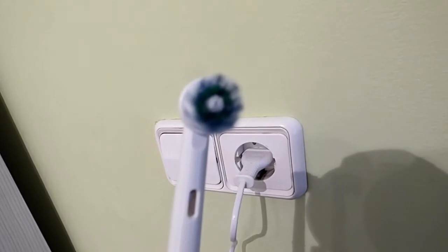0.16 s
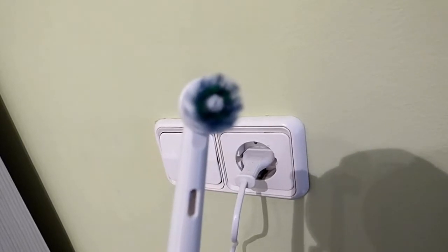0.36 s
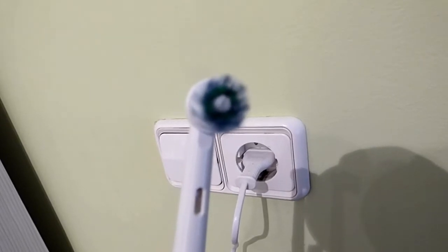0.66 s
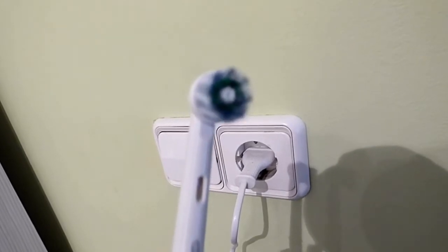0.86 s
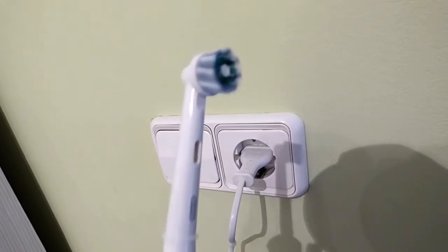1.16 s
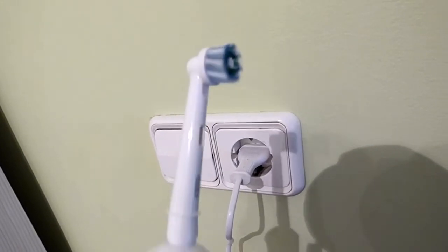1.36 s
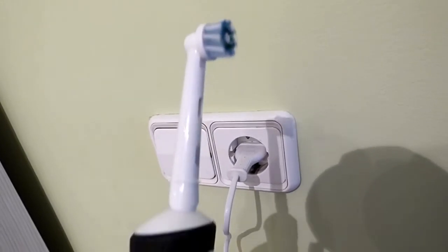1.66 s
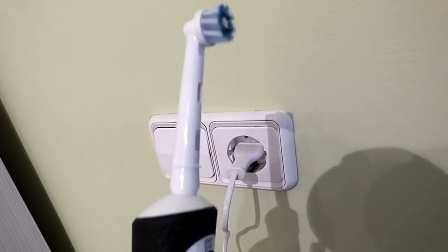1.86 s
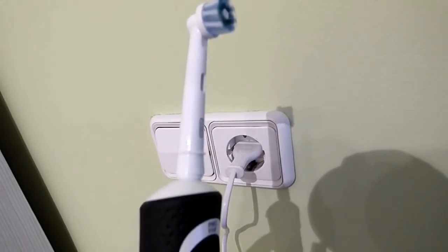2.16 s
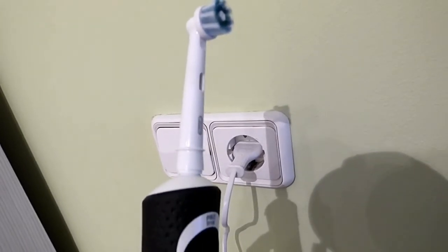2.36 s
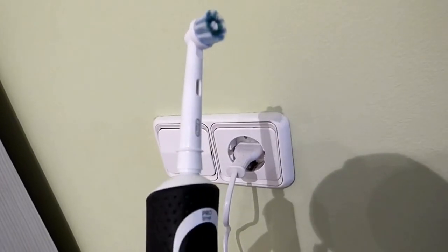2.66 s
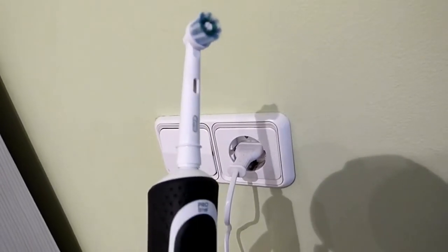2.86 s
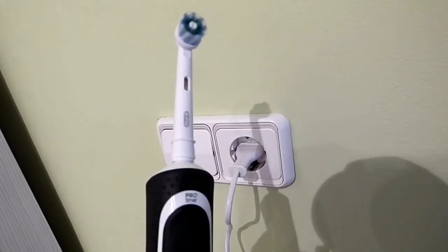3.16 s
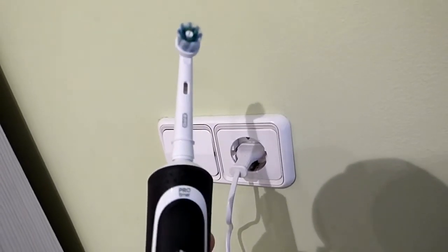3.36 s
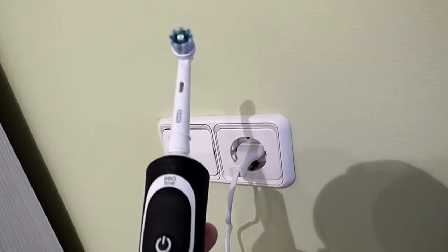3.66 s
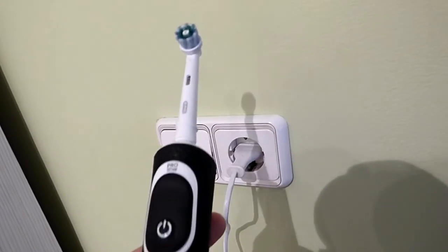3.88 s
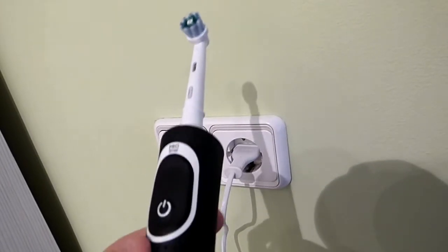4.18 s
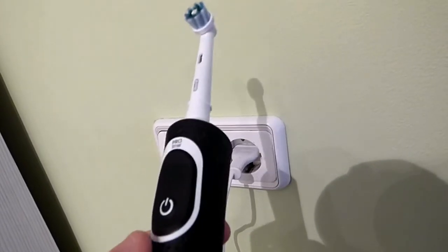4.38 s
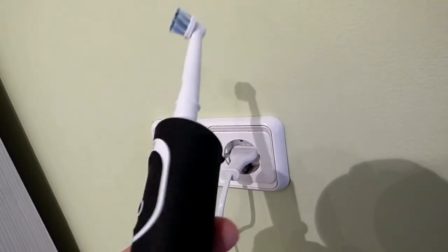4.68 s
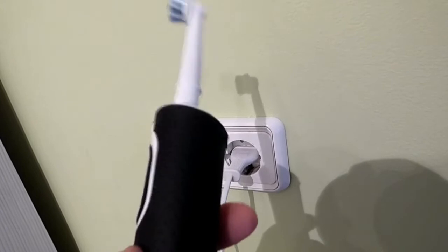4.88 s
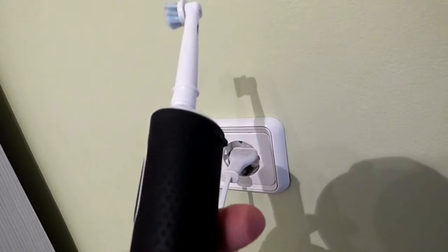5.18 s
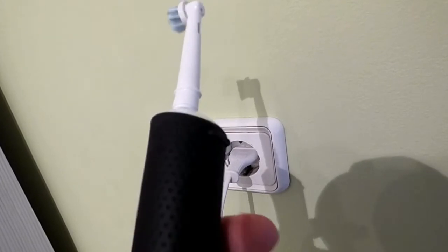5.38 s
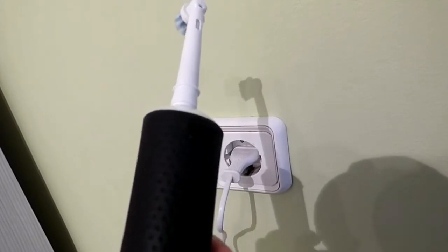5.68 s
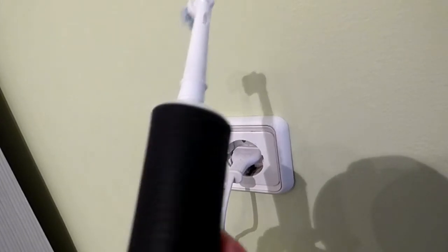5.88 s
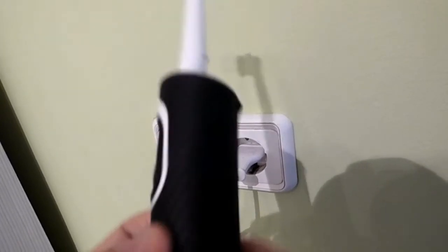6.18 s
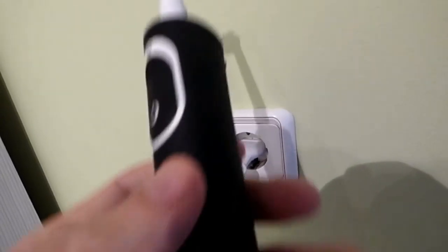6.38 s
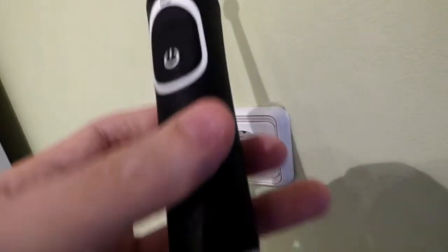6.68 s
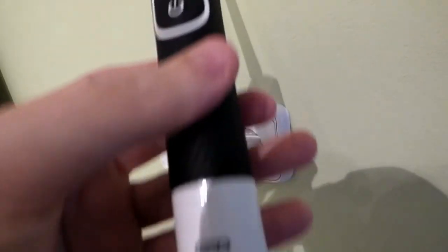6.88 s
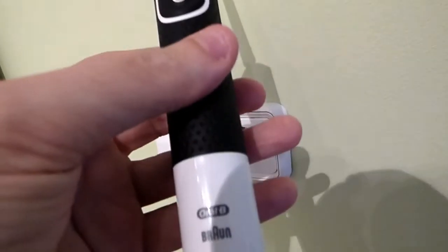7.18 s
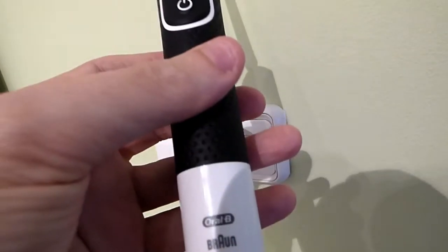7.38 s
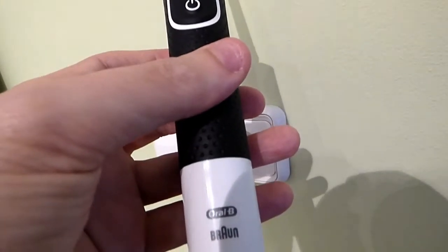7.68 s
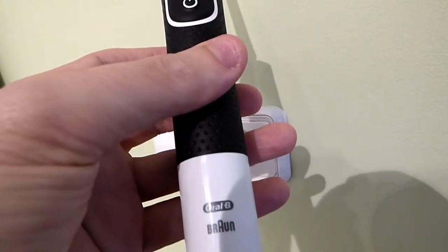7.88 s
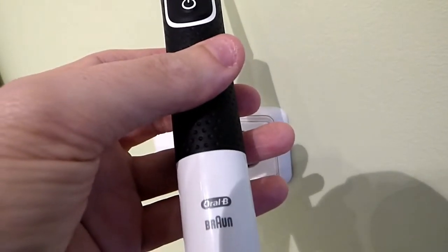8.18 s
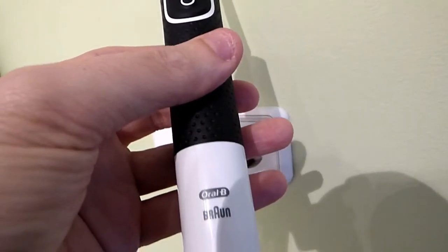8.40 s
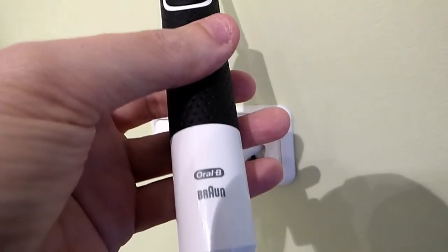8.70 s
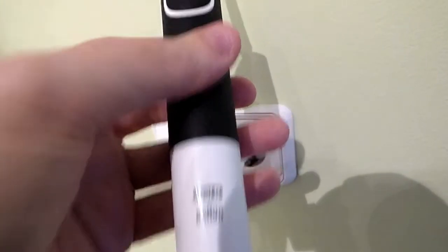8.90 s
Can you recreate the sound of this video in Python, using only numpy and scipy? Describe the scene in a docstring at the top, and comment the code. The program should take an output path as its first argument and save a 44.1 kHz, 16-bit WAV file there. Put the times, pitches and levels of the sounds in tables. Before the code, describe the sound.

An electric toothbrush buzzes steadily up close, its whining, rattling tone shifting as it is turned in the hand.

```python
"""A quiet room with a short echo: an electric toothbrush runs in the air, close to a stereo microphone. A small
motor drives a 10-tooth pinion on a 26-tooth crown wheel, whose crank swings the head to and fro about 62 times
a second. The shaft whines, the gears grind and click, and the linkage knocks at fixed crank angles. A hand
turns the brush about, and the casing sounds different from each side. A faint rumble lies underneath."""
import sys
import numpy as np
from scipy import signal
from scipy.fft import rfft, irfft, next_fast_len
from scipy.io import wavfile
from scipy.ndimage import map_coordinates

SR = 44100
rng = np.random.default_rng(int(sys.argv[2]) if len(sys.argv) > 2 else 0)


def digitize_waveform(pressure):
    """Quantize a signal to 16-bit integers and store it at the path in sys.argv[1].

    Rows of a 2-D input are taken as channels; values are limited to [-1, 1].
    """
    field = np.atleast_2d(pressure).T
    bounded = np.clip(field, -1, 1)
    quanta = np.round(bounded * 32767).astype(np.int16)
    wavfile.write(sys.argv[1], SR, quanta)


N = 398663

CROWN, PINION = 26, 10  # teeth
# how the hand holds the brush: t/s, angle/deg, part facing the microphone (0 head, 1 handle), gain/dB
POSE = [(0, 52, 0.076, -1.5), (.85, 49, 0.16, -1.5), (1.55, 68, 0.075, 0.5), (2.5, 55, 0.21, 0),
        (3.1, 43, 0.21, -0.6), (3.6, -21, 0.57, -0.5), (4, -26, 0.44, 0), (4.3, -23, 0.54, 1),
        (4.6, -38, 0.66, 1), (4.78, -100, 0.72, -1), (5.45, -127, 0.65, -1), (5.8, -119, 0.7, -1.8),
        (6.05, -124, 0.85, -1), (6.35, -66, 0.98, -1), (6.75, -1, 1.04, -1.5), (7.1, -18, 1.04, -0.5),
        (7.5, -14, 1, -0.5), (7.9, -15, 1, -0.6), (8.25, -3, 1, -1), (8.6, -13, 1.06, -0.5),
        (9.04, -8, 1.07, -0.5)]


def brush():
    """The whole brush at close range: motor, gears and linkage, all locked to one crank."""
    crank_speed = [(0, 61.83), (2.25, 61.812), (3.75, 61.845), (4.5, 61.87), (5.25, 61.95), (6.6, 62.004),
                   (7.5, 61.98), (9.04, 61.975)]  # t/s, speed/(turns/s)
    turns = np.cumsum(curves(crank_speed)[0]) / SR
    rattling = rattle(turns)
    works = whine(turns) + knocks(turns) + mesh(turns) + rattling
    body = amp(-26.5) * highpass(casing(works), corner_hz=220)  # too small to radiate bass
    sound = body + link(turns) + pin(turns) + neck(rattling)
    return sound + hand_scatter(sound) + beamed_tones(turns) + handle_hum(turns)


def whine(turns):
    """Shaft tones, pumped once per motor turn, and the armature's own tones."""
    shaft = [(7, 0.5), (10, 1.5), (15, -2.5), (17, 8), (18, 7), (20, -4), (21, 4), (23, 2.5), (25, 8),
             (27, 2.5), (30, 1.5), (31, 0.5), (33, 0), (34, 5.5)]  # tones of the swinging shaft: crank order, relative level/dB
    armature = [(7.8, -0.5), (10.4, -6.5), (11.4, -2.5), (13, -9), (18.2, 5), (36.4, 3.5), (37.6, 4.5)]  # its tones and its beat with the shaft: crank order, relative level/dB
    pump = 1 + .5 * motor_cycle(turns)
    return amp(-32.5) * (pump * tones(turns, shaft, waver_db=1.2) + tones(turns, armature, waver_db=1.2))


def beamed_tones(turns):
    """The loudest tones of shaft and gear mesh beam from neck and casing, each its own way; the motor pumps
    them."""
    orders = [8, 9, 11, 12, 14, 16, 26, 28]  # the tones: crank order
    levels = [(0.0, -47.0, -50.0, -47.0, -50.0, -68.0, -63.0, -51.0, -42.0),
              (0.9, -47.0, -50.0, -47.0, -51.0, -68.0, -59.0, -50.0, -42.0),
              (1.5, -45.0, -49.0, -49.0, -53.0, -70.0, -57.0, -55.0, -42.0),
              (2.1, -43.0, -48.0, -48.0, -51.0, -64.0, -53.0, -60.0, -43.0),
              (2.6, -43.0, -47.0, -47.0, -49.0, -61.0, -55.0, -59.0, -44.0),
              (3.1, -42.0, -46.0, -46.0, -47.0, -55.0, -55.0, -56.0, -43.0),
              (3.4, -44.0, -47.0, -45.0, -45.0, -54.0, -58.0, -54.0, -43.0),
              (3.7, -46.0, -48.0, -46.0, -45.0, -52.0, -63.0, -52.0, -42.0),
              (4.1, -50.0, -52.0, -46.0, -45.0, -51.0, -61.0, -48.0, -42.0),
              (4.4, -52.0, -54.0, -48.0, -45.0, -50.0, -55.0, -45.0, -41.0),
              (4.62, -53.0, -57.0, -50.0, -46.0, -52.0, -55.0, -45.0, -42.0),
              (4.78, -50.0, -65.0, -60.0, -49.0, -60.0, -52.0, -43.0, -43.0),
              (5.0, -44.0, -57.0, -57.0, -52.0, -67.0, -47.0, -42.0, -45.0),
              (5.3, -42.0, -47.0, -49.0, -58.0, -63.0, -47.0, -41.0, -51.0),
              (5.55, -42.0, -45.0, -46.0, -54.0, -56.0, -47.0, -42.0, -60.0),
              (5.8, -42.0, -43.0, -45.0, -53.0, -53.0, -47.0, -43.0, -57.0),
              (6.05, -40.0, -44.0, -47.0, -58.0, -56.0, -46.0, -40.0, -49.0),
              (6.22, -47.0, -54.0, -52.0, -55.0, -57.0, -49.0, -40.0, -43.0),
              (6.4, -53.0, -58.0, -54.0, -49.0, -54.0, -54.0, -42.0, -43.0),
              (6.7, -52.0, -56.0, -47.0, -48.0, -49.0, -55.0, -44.0, -45.0),
              (7.1, -49.0, -54.0, -44.0, -47.0, -47.0, -53.0, -46.0, -49.0),
              (8.0, -48.0, -54.0, -44.0, -47.0, -47.0, -55.0, -44.0, -47.0),
              (9.04, -47.0, -53.0, -44.0, -49.0, -47.0, -58.0, -43.0, -46.0)]  # toward the microphone as the brush turns: t/s, then level/dB per order
    pump = 1 + .12 * motor_cycle(turns)
    return pump * tones(turns, zip(orders, curves(levels)), waver_db=.3)


def knocks(turns):
    """The linkage takes up its play nearly alike each turn; the timing drifts a little."""
    contacts = [(.9, -3, 0.88), (.42, -3.5, -0.95), (0.0972, -5, 1)]  # ends of the play: crank angle/turns, relative level/dB, signed weight
    colour = [(1500, -34.5), (2300, -8), (2750, -23.5), (3200, -31), (3800, -21.5), (4400, -21),
              (4750, -33), (5200, -4), (6000, -17.5), (9000, -23)]  # resonances of a knock: f/Hz, gain/dB
    drifting = turns + .0007 * wobble(4)
    angles, sizes = each_turn(turns, contacts, scatter_db=1, motor_db=1)
    return ringing(unit(blows(drifting, angles, sizes, jitter_s=.00001)), colour)


def mesh(turns):
    """Each pair of gear teeth meets with its own error, so the grind repeats every five crank turns."""
    colour = [(300, -13), (480, -15), (700, -11), (950, -3), (1250, -3), (1500, -6), (2200, -3.5),
              (2850, -4), (3500, -13), (5000, -12), (9000, -23)]  # resonances of the gears: f/Hz, gain/dB
    pair = np.arange(CROWN * PINION // 2)
    error = rng.standard_normal(CROWN)[pair % CROWN] * rng.uniform(-1, 1, PINION)[pair % PINION]
    every_turn = error.reshape(-1, CROWN).mean(axis=0)  # this share belongs to the whine
    error = unit(error - np.tile(every_turn, PINION // 2))
    tooth = np.arange(int(turns[-1] * CROWN))
    force = error[tooth % len(pair)] + .25 * rng.standard_normal(len(tooth))
    return ringing(unit(blows(turns, tooth / CROWN, force, jitter_s=.00002)), colour)


def rattle(turns):
    """Gear teeth click as they meet, giving bursts of noise at fixed crank angles, over a steady scrape."""
    contacts = [(.03, -7, 0.86), (.08, -6.5, 1), (.22, -3, 1), (.27, -8, 1), (.33, -27, 0.77),
                (.41, -0.5, 0.57), (.47, -8, 0.77), (.65, -5.5, 0.99), (.72, -6.5, 0.83), (.83, -22, 0.7),
                (.89, -5, 0.93), (.95, -1.5, 0.94)]  # clicks as gear teeth meet: crank angle/turns, relative level/dB, weight
    colour = [(300, -5), (450, -12), (700, -14.5), (1100, -10.5), (1700, -11), (2300, -10.5), (3200, -7.5),
              (3800, -11.5), (4400, -11), (4850, -8.5), (6000, -2), (8000, -0.5), (15000, -1)]  # spectrum of the rattle: f/Hz, gain/dB
    burst = decay(np.arange(500) / SR, t60_s=.0074, attack_s=.00017)
    angles, sizes = each_turn(turns, contacts, scatter_db=2.5, motor_db=3)
    kicks = np.abs(blows(turns, angles, sizes, jitter_s=.0002))
    envelope = .4 + 1.08 * unit(signal.fftconvolve(kicks, burst)[:N])
    return equalised(unit(envelope * rng.standard_normal(N)), colour)


def link(turns):
    """The steel link, struck five times a turn, rings near 3.2 kHz."""
    angles = [.4523, .8249, .8724, .1127, .9041]  # strikes: crank angle/turns
    ring = [(0.0, 3320.0, -31.0, -21.0, -40.0, -44.0, -22.0),
            (0.9, 3350.0, -27.0, -22.0, -34.0, -44.0, -22.0),
            (1.5, 3290.0, -24.0, -21.0, -20.0, -27.0, -35.0),
            (2.1, 3240.0, -20.0, -22.0, -32.0, -38.0, -27.0),
            (2.6, 3190.0, -21.0, -25.0, -44.0, -43.0, -24.0),
            (3.1, 3120.0, -20.0, -23.0, -44.0, -37.0, -23.0),
            (3.4, 3130.0, -19.0, -17.0, -43.0, -23.0, -24.0),
            (3.7, 3140.0, -30.0, -13.0, -24.0, -21.0, -22.0),
            (4.1, 3170.0, -45.0, -13.0, -15.0, -18.0, -21.0),
            (4.4, 3180.0, -26.0, -23.0, -15.0, -32.0, -44.0),
            (4.62, 3200.0, -36.0, -12.0, -13.0, -21.0, -22.0),
            (4.78, 3140.0, -20.0, -34.0, -10.0, -35.0, -29.0),
            (5.0, 3100.0, -21.0, -44.0, -10.0, -41.0, -17.0),
            (5.3, 3130.0, -24.0, -43.0, -12.0, -40.0, -24.0),
            (5.55, 3380.0, -23.0, -11.0, -16.0, -44.0, -12.0),
            (5.8, 3380.0, -34.0, -13.0, -12.0, -20.0, -11.0),
            (6.05, 3120.0, -42.0, -37.0, -14.0, -20.0, -13.0),
            (6.22, 3070.0, -38.0, -22.0, -13.0, -30.0, -12.0),
            (6.4, 3070.0, -27.0, -23.0, -17.0, -31.0, -14.0),
            (6.7, 3060.0, -24.0, -32.0, -22.0, -30.0, -18.0),
            (7.1, 3220.0, -23.0, -25.0, -22.0, -35.0, -23.0),
            (8.0, 3130.0, -24.0, -27.0, -23.0, -31.0, -22.0),
            (9.04, 3130.0, -23.0, -25.0, -25.0, -30.0, -27.0)]  # ring of the link: t/s, f/Hz, then level/dB per strike
    return struck(turns, angles, ring, t60_s=.013, jitter_s=.000006)


def pin(turns):
    """The steel pin, struck four times a turn, rings near 4.8 kHz."""
    angles = [.8523, .5458, .3757, .1613]  # strikes: crank angle/turns
    ring = [(0.0, 4850.0, -22.0, -45.0, -30.0, -45.0), (0.9, 4910.0, -22.0, -34.0, -30.0, -45.0),
            (1.5, 4840.0, -26.0, -29.0, -21.0, -45.0), (2.1, 4830.0, -24.0, -22.0, -18.0, -35.0),
            (2.6, 4760.0, -20.0, -21.0, -18.0, -35.0), (3.1, 4750.0, -20.0, -21.0, -20.0, -31.0),
            (3.4, 4720.0, -20.0, -38.0, -43.0, -29.0), (3.7, 4750.0, -23.0, -45.0, -45.0, -35.0),
            (4.1, 4790.0, -21.0, -45.0, -45.0, -42.0), (4.4, 4800.0, -20.0, -32.0, -45.0, -37.0),
            (4.6, 4790.0, -21.0, -42.0, -34.0, -45.0), (4.7, 4830.0, -14.0, -36.0, -20.0, -44.0),
            (5.0, 4820.0, -19.0, -40.0, -20.0, -19.0), (5.3, 4880.0, -17.0, -43.0, -22.0, -21.0),
            (5.55, 4720.0, -15.0, -45.0, -42.0, -24.0), (5.8, 4700.0, -44.0, -37.0, -18.0, -32.0),
            (6.05, 4790.0, -27.0, -31.0, -20.0, -35.0), (6.22, 4800.0, -31.0, -36.0, -26.0, -44.0),
            (6.4, 4790.0, -43.0, -26.0, -27.0, -30.0), (6.7, 4890.0, -26.0, -37.0, -45.0, -45.0),
            (7.1, 4910.0, -45.0, -33.0, -22.0, -44.0), (8.0, 4930.0, -23.0, -27.0, -39.0, -42.0),
            (9.04, 4930.0, -23.0, -22.0, -25.0, -26.0)]  # ring of the pin: t/s, f/Hz, then level/dB per strike
    return struck(turns, angles, ring, t60_s=.011, jitter_s=.000007)


def struck(turns, angles, table, t60_s, jitter_s):
    """A small steel part rings briefly at each strike; the table's levels stand for gravity and grip."""
    hz, *level_db = curves(table)
    at, size = each_turn(turns, [(angle, 0, 1) for angle in angles], scatter_db=.7, motor_db=.5)
    start = np.clip(passing(turns, at, jitter_s), 0, N - 1)
    first = start.astype(int)
    strike = np.arange(len(at)) % len(angles)
    size = size * amp(np.array(level_db)[strike, first])
    taps = first[:, None] + np.arange(1, 700)
    age = (taps - start[:, None]) / SR
    ring = decay(age, t60_s, attack_s=.00019) * np.sin(2 * np.pi * hz[first][:, None] * age)
    return np.bincount(taps.ravel(), (size[:, None] * ring).ravel(), N + 700)[:N]


def neck(rattling, centre_hz=6530, width_hz=150):
    """The air in the hollow neck sizzles with the rattle, loudest when its slot faces the microphone."""
    sizzle = [(0, -50), (1.1, -42), (1.5, -37), (2.1, -39), (3, -37), (3.6, -47), (4.5, -38), (5.6, -51),
              (6.2, -41), (6.8, -52), (9.04, -50)]  # t/s, level/dB
    tube = lambda hz: 1j * hz * width_hz / (centre_hz ** 2 - hz ** 2 + 1j * hz * width_hz)
    return amp(curves(sizzle)[0]) * unit(filtered(rattling, tube))


def casing(works, step_s=.1):
    """The works heard through whichever side and part of the brush faces the microphone."""
    # colour of casing, neck and head: f/Hz, gain/dB all round, extra gain/dB from front, flank, handle
    sides = [(333, -6, 1, -2, -5), (414, -2, -8.5, -0.5, 0), (491.6, 2.5, -4.5, 2.5, 8.5),
             (476, 1, -4, -4.5, 3.5), (623, 2.5, 4.5, 2.5, 3), (737, 1, 4.5, -5.5, 5.5),
             (850, -7.5, 1.5, 0.5, 6.5), (966, -5, 4.5, -3, 13), (1100, -3.5, -5.5, 6, 11),
             (1434, -3, 1.5, -4, 3), (1746, 3.5, -2, 1, 8.5), (2026, 7, 1.5, 0.4, 0), (2285, 4, -1, 1.1, 8),
             (2765, 6, 0.5, -2, -2.5), (2924, 13.5, 1, -7, -5), (3305, 16, -6, -2.5, -11),
             (3320, 15.5, -0.5, -0.5, -2.5), (3580, 7, -6, -7.5, 4.5), (4270, 14, -6, 3.5, 6.5),
             (4340, -2, -1, 1.5, 1), (4575, 15, 0, -1.5, -1), (5370, 7.5, -2.5, 1, 4),
             (5750, 6, -3.3, 1.7, 4), (6400, 9, 1, -0.5, -1), (7100, 6, -1.5, 0, 4), (7760, 4.5, 0, 2, 10),
             (8600, 2, -0.5, 1, 7.5), (10040, 1, -1, 0.1, 5), (10870, -1, -1.5, 3.5, 5.5),
             (11070, -1.5, -3.5, 4, 9), (12080, -8, -1, 2.5, 7.5), (15900, -25.5, -1.5, 2, 9.5)]
    hz, all_round, front, flank, handle = np.transpose(sides)
    turned_deg, part, close_db = curves(POSE)
    step = round(step_s * SR)
    padded, out = np.pad(works, (step, 3 * step)), np.zeros(N + 4 * step)
    fade = np.pad(np.hanning(2 * step + 1)[:-1], (0, step))  # crossfade, with space to ring out
    for at in range(0, N + step, step):
        now = min(at, N - 1)
        angle = np.radians(turned_deg[now])
        colour = all_round + front * np.cos(angle) + flank * np.sin(angle) + handle * part[now]
        piece = padded[at:at + len(fade)]
        rung = ringing(piece * fade[:len(piece)], np.transpose([hz, colour]))
        out[at:at + len(fade)] += rung[:len(piece)]
    return amp(close_db) * out[step:step + N]


def hand_scatter(x):
    """Hand and casing scatter the treble; the detour shrinks as the handle end nears, so notches slide."""
    part, sample = curves(POSE)[1], np.arange(N)
    treble = highpass(x, corner_hz=5500)
    delays_ms = [1.05 - .294 * part + .033 * wobble(1.35), .62 - .2 * part + .028 * wobble(1.123)]
    return amp(-13) * sum(np.interp(sample - ms * SR / 1000, sample, treble) for ms in delays_ms)


def handle_hum(turns):
    """The shaking handle gives a low hum."""
    partials = [(2, -53), (2.597, -60.5), (3, -56.5), (4.001, -57.5), (5.6, -94), (5.999, -63.5)]  # crank order, level/dB
    return tones(turns, partials, waver_db=.13)


def walls(x):
    """The room answers in stereo from behind the brush; the treble dies first."""
    decay_times = [(200, 0.24), (2000, 0.2), (10000, 0.1)]  # reverberation: f/Hz, t60/s
    colour = [(150, -20), (400, -14.5), (2000, -8.5), (5000, -6), (8000, -13), (14000, -6)]  # strength of the reflections: f/Hz, gain/dB
    hz, t, noise = signal.stft(rng.standard_normal((2, SR // 2)), SR, nperseg=256)
    tail = signal.istft(noise * amp(-60 * t / along(decay_times, hz)[:, None]), SR, nperseg=256)[1]
    wet = signal.fftconvolve(x[None], tail / np.linalg.norm(tail[0]), axes=1)[:, :N]
    return equalised(wet, colour)


def room_tone():
    """A faint rumble, partly shared by both sides of the microphone."""
    spectrum = [(20, -5), (35, -2), (55, -6), (90, 1), (200, 2), (400, -15), (1000, -34), (4000, -33)]  # the rumble: f/Hz, relative level/dB
    shared, *own = rng.standard_normal((3, N))
    return amp(-59.5) * unit(equalised(shared + .7 * np.array(own), spectrum))


def motor_cycle(turns):
    """A cosine with one cycle per motor turn."""
    return np.cos(2 * np.pi * turns * CROWN / PINION)


def tones(turns, table, waver_db):
    """Sines at multiples (orders) of the crank speed, each wavering in level."""
    return sum(np.sqrt(2) * amp(db + waver_db * wobble(2.95))
               * np.sin(2 * np.pi * (order * turns + rng.random())) for order, db in table)


def each_turn(turns, contacts, scatter_db, motor_db):
    """Angles and sizes of contacts, turn after turn; the unbalanced armature adds to or takes from each."""
    angle, db, weight = np.transpose(contacts)
    at = np.arange(int(turns[-1]))[:, None] + angle
    size = weight * amp(db + motor_db * motor_cycle(at) + scatter_db * rng.uniform(.48, 1, at.shape))
    return at.ravel(), size.ravel()


def passing(turns, angles, jitter_s):
    """Fractional samples at which the crank passes the angles, with jitter."""
    return np.interp(angles, turns, np.arange(N)) + jitter_s * SR * rng.standard_normal(len(angles))


def blows(turns, angles, sizes, jitter_s):
    """Pulses at the given crank angles, placed between samples by a windowed sinc."""
    at = passing(turns, angles, jitter_s)[:, None]
    taps = np.floor(at) + np.arange(-7, 9)
    pulse = np.sinc(taps - at) * np.cos(np.pi * (taps - at) / 16) ** 2
    return np.bincount(np.clip(taps, 0, N).astype(int).ravel(), (sizes[:, None] * pulse).ravel(), N + 1)[:N]


def decay(age, t60_s, attack_s):
    """A quick rise and an exponential fall."""
    return amp(-60 * age / t60_s) * (1 - np.exp(-age / attack_s))


def ringing(x, colour):
    """x through a body (f/Hz, gain/dB) that rings after the blow, not before it: minimum phase."""
    cepstrum = irfft(np.log(amp(along(colour, np.fft.rfftfreq(4096, 1 / SR)))))
    cepstrum[1:len(cepstrum) // 2] *= 2
    cepstrum[len(cepstrum) // 2 + 1:] = 0
    return signal.oaconvolve(x, irfft(np.exp(rfft(cepstrum))))[:N]


def filtered(x, response):
    """x times a complex response of frequency."""
    size = 2 * next_fast_len(N // 2 + 4096)
    return irfft(rfft(x, size) * response(np.fft.rfftfreq(size, 1 / SR)), size)[..., :N]


def equalised(x, colour):
    return filtered(x, lambda hz: amp(along(colour, hz)))


def highpass(x, corner_hz):
    return filtered(x, lambda hz: hz ** 4 / (hz ** 4 + corner_hz ** 4))


def amp(db):
    return 10 ** (np.asarray(db) / 20)


def unit(x):
    return x / np.sqrt(np.mean(x ** 2))


def along(points, hz):
    """Points (f/Hz, value) joined on a log axis."""
    f, value = np.transpose(points)
    return np.interp(np.log(hz + 1), np.log(f + 1), value)


def curves(rows):
    """One value per sample for each column after the time."""
    times, *columns = np.transpose(rows)
    return [np.interp(np.arange(N) / SR, times, column) for column in columns]


def wobble(rate):
    """A smooth random curve, rate knots a second."""
    knots = rng.standard_normal(int(N * rate / SR) + 4)
    grid = np.arange(0, N + 64, 64)
    return np.interp(np.arange(N), grid, map_coordinates(knots, [grid * rate / SR]))


def scene():
    """The brush close to the stereo microphone, the room behind it."""
    lean = [(60, 2), (130, 1), (290, -1), (640, 2), (1410, -1), (3100, 2), (6820, 0.0), (15000, -1)]  # left over right: f/Hz, level/dB
    lead = [(0, 0.9), (860, -0.64), (1290, -0.17), (3270, 0.12), (5250, -0.0067), (15300, 0.13)]  # left ahead of right: f/Hz, phase/rad
    source, sides = brush(), np.array([[.5], [-.5]])
    pickup = lambda hz: amp(sides * along(lean, hz)) * np.exp(1j * sides * along(lead, hz))
    return filtered(source[None], pickup) + walls(source) + room_tone()


def record(dry, top_hz=15740):
    """The microphone chain passes nothing above its band limit."""
    return filtered(dry, lambda hz: hz < top_hz)


dry = scene()
out = record(dry)
digitize_waveform(out)
```